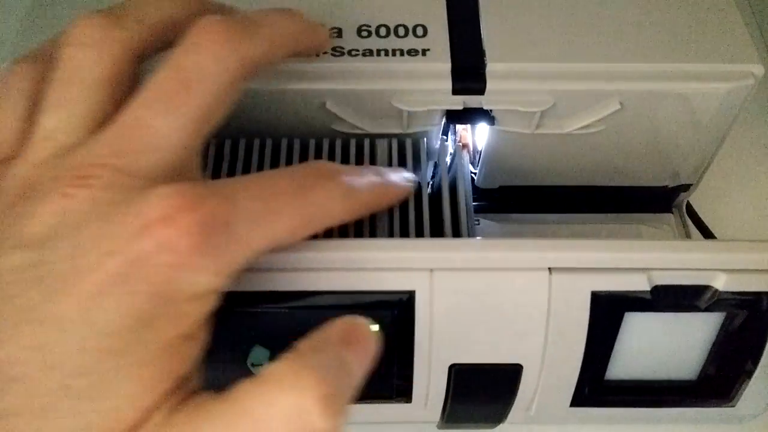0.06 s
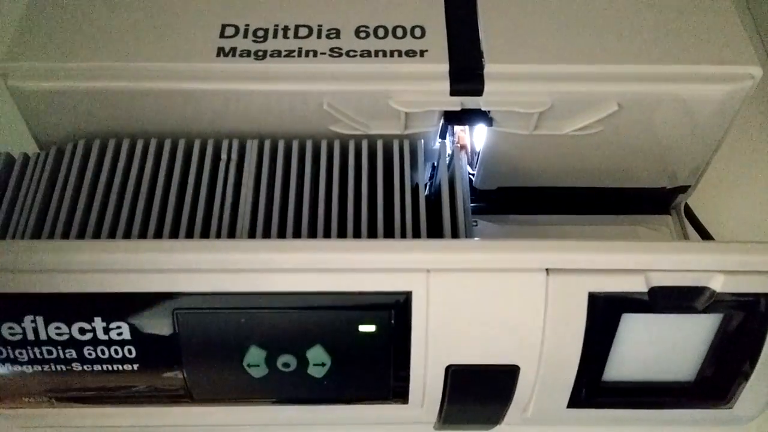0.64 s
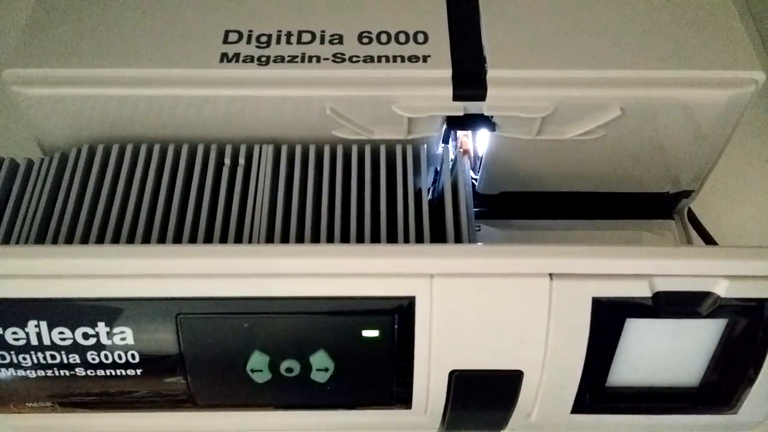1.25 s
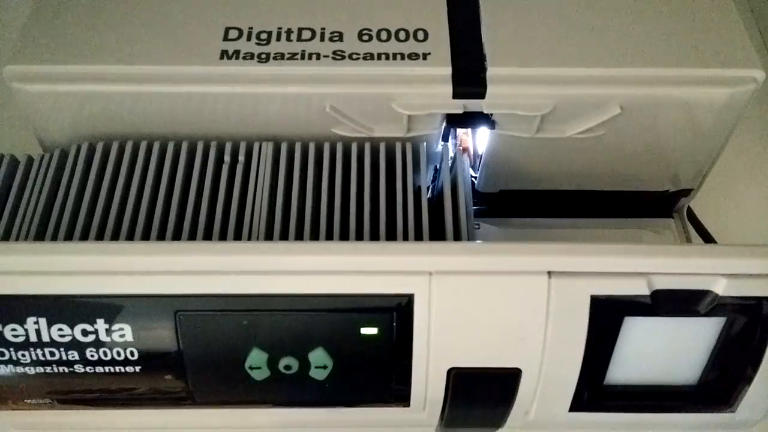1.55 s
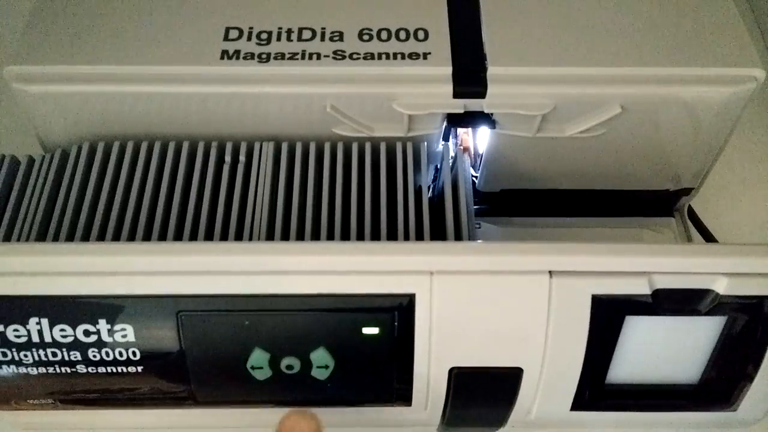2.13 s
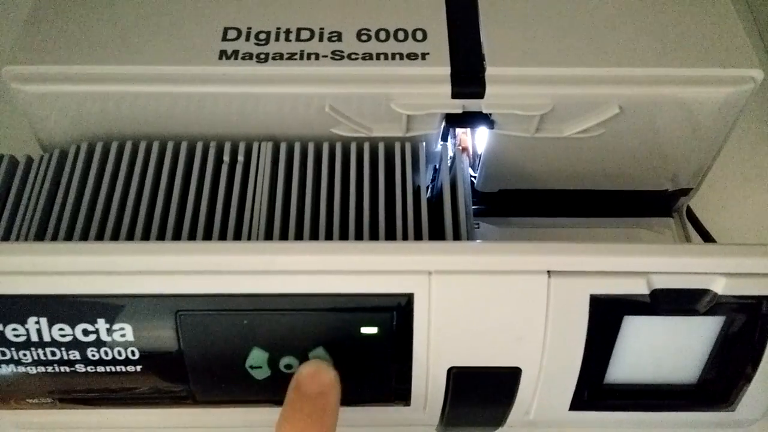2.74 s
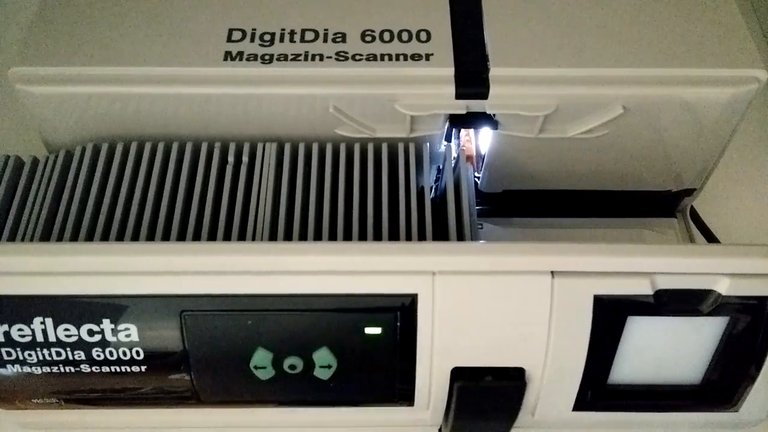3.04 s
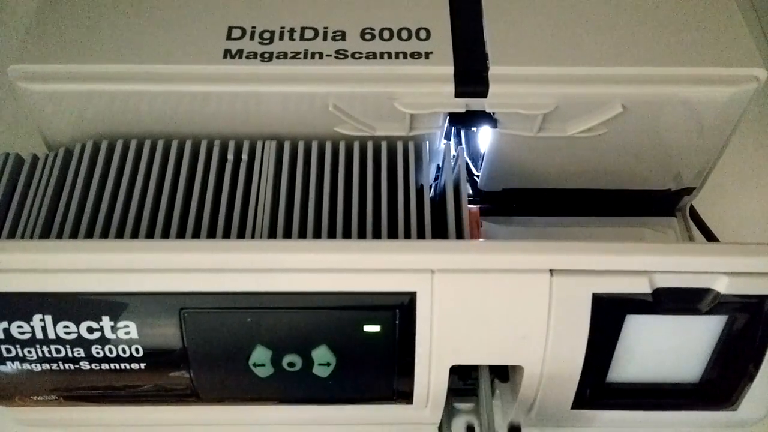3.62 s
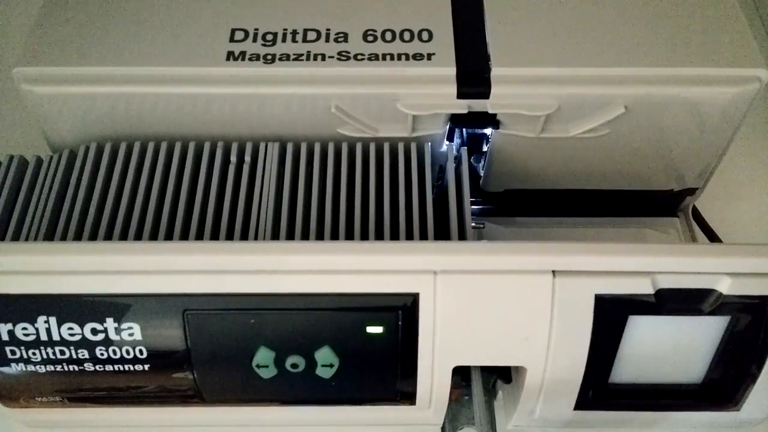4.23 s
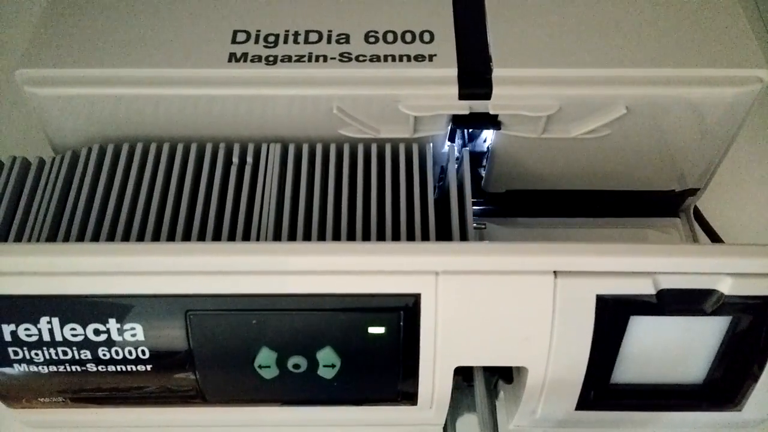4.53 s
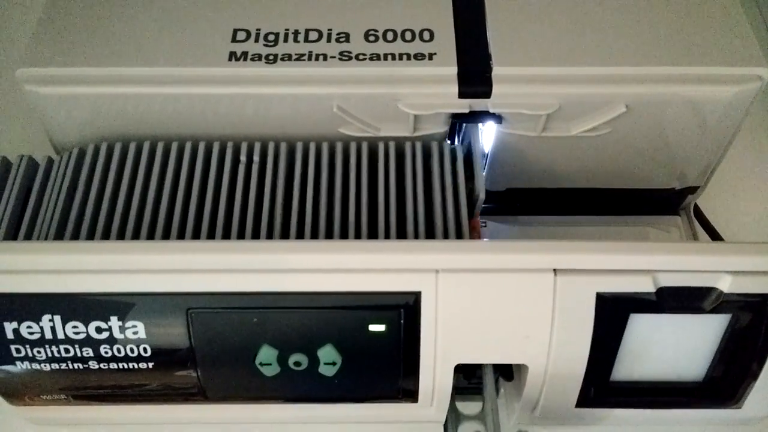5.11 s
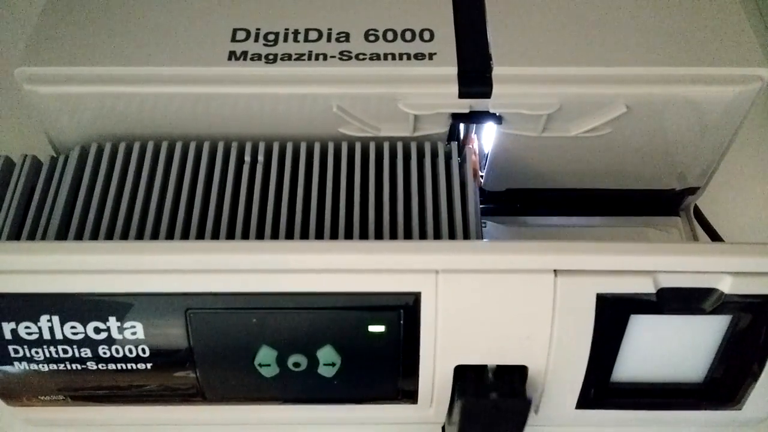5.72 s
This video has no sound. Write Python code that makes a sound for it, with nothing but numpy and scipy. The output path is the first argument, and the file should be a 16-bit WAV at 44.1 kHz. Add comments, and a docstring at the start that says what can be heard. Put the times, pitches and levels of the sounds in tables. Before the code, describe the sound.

Close by in a quiet room, plastic slides clatter briefly under a fingertip, followed by a soft rustle of cloth and a low hush. A button press then starts a motorised slide changer. For about three seconds its motor whirs in short stretches, switching between a lower and a higher pitch, with churning gears, rasping, squeaking plastic, sharp clicks and dull knocks from the casing.

```python
"""Slide scanner changing a slide

Close by in a quiet room, a finger riffles over plastic slide frames; the arm draws back and returns to
press a button. A stepper motor then runs the changing cycle leg by leg at two speeds: its gears churn,
the carrier scrapes along its guide, and latches and frames knock in the plastic case."""
import sys
import numpy as np
from scipy import signal
from scipy.fft import rfft, irfft
from scipy.io import wavfile
from scipy.ndimage import uniform_filter1d

SR = 44100
rng = np.random.default_rng(int(sys.argv[2]) if len(sys.argv) > 2 else 0)


def transcribe(signal):
    """Save signal, clipped to [-1, 1], as a 16-bit WAV file at the path in sys.argv[1]."""
    frames = np.atleast_2d(signal).T
    limited = np.clip(frames, -1, 1)
    pcm = np.round(limited * 32767).astype(np.int16)
    wavfile.write(sys.argv[1], SR, pcm)


N = 254016
T, HZ = np.arange(N) / SR, np.fft.rfftfreq(N, 1 / SR)

# Legs of the changing cycle: start/s, end/s, speed (0 slow, 1 fast), step tone/dB, its swell/dB,
# churn/dB, rumble/dB, hiss/dB, opening lurch/dB
LEGS = [(2.84, 3.154, 0, -51, 12, -47.5, -51.5, -64, 3),
        (3.168, 3.998, 1, -40.5, -2.5, -54.5, -55, -61, 12),
        (3.966, 4.244, 1, -43, 2.5, -55, -53.5, -60.5, 7),
        (4.228, 4.612, 1, -50.5, -2, -53, -56.5, -61.5, 6),
        (4.615, 4.973, 0, -45.5, 1.5, -67, -61, -64.5, 22), (4.952, 5.535, 0, -42, 3, -51.5, -54, -59, 6),
        (5.528, 5.8, 1, -46, -9.5, -49.5, -49.5, -57.5, 5)]


def amp(db):
    """Decibels to gain."""
    return 10 ** (np.asarray(db) / 20)


def unit(x):
    """Scales a sound so that the mean of its channels has rms 1."""
    return x / np.sqrt(np.mean(np.atleast_2d(x).mean(0) ** 2) + 1e-20)


def read(points, hz):
    """Reads a curve on a log-frequency axis."""
    f, value = np.transpose(points)
    return np.interp(np.log(hz + 1), np.log(f + 1), value)


def colour(x, spectrum):
    """Minimum-phase EQ: shapes a sound without smearing its attacks backwards."""
    gain = amp(read(spectrum, HZ))
    log_gain = np.log(np.maximum(gain / gain.max(), 1e-5))
    log_response = np.conj(signal.hilbert(np.r_[log_gain, log_gain[-2:0:-1]]))
    taps = np.fft.ifft(np.exp(log_response)).real[:4096]
    return signal.oaconvolve(x, taps / np.linalg.norm(taps))[:N]


def ring(x, modes):
    """Drives a set of damped modes."""
    t = T[:SR // 4]
    taps = sum(amp(db) * width * np.exp(-np.pi * width * t) * np.sin(2 * np.pi * hz * t)
               for hz, width, db in modes)
    return signal.oaconvolve(x, taps / np.linalg.norm(taps))[:N]


def waver(samples):
    """Slow random drift of rms 1."""
    return unit(uniform_filter1d(uniform_filter1d(rng.standard_normal(N), samples), samples))


def grains(per_s, spread_db):
    """A random train of tiny contacts of unequal size."""
    size = amp(spread_db * np.minimum(rng.exponential(1, N), 4)) * rng.choice([-1, 1], N)
    return unit(size * (rng.random(N) < per_s / SR))


def rattle(blows, first_db=-7):
    """Each blow (t/s, level/dB, chatter/s) is a first contact, then a quick run of them dying away."""
    chatter, out = grains(2500, 0.44), np.zeros(N)
    rise_s = 0.0009
    for start, db, length in blows:
        at = round(start * SR)
        t = T[:min(SR // 8, N - at)]
        burst = chatter[at:at + len(t)] * np.exp(-(t / (2 * length)) ** 2) * (1 - np.exp(-t / rise_s))
        burst[0] += amp(first_db) * np.linalg.norm(burst)
        gain = amp(db) * np.sqrt((length + 0.0041) * SR / (np.sum(burst ** 2) + 1e-9))
        out[at:at + len(t)] += gain * burst
    return out


def wash(spectrum):
    """Steady stereo noise, wide in the treble."""
    likeness = [(130, 0.9), (300, 0.53), (640, 0.4), (1400, 1), (3000, 0), (7000, 0)]  # between the microphone ports: f/Hz, correlation
    left, other = rfft(rng.standard_normal((2, N)))
    same = read(likeness, HZ)
    right = same * left + np.sqrt(1 - same ** 2) * other
    return unit(irfft(np.array([left, right]) * amp(read(spectrum, HZ)), N))


def hold(start, end, attack_s, release_s):
    """Envelope that rises, holds until end, then dies away."""
    return np.clip((T - start) / attack_s, 0, 1) * np.exp(-np.maximum(T - end, 0) / release_s)


def running(start, end, ramp_s=0.028):
    """1 while the motor drives a leg, with short ramps at both ends."""
    return np.clip(np.minimum(T - start, end - T) / ramp_s, 0, 1)


def stepper(jitter_rad=0.0136, flutter_db=2.0, load_db=0.9):
    """Clocked steps give a clean whine; the changing load shakes its level and phase."""
    # Step overtones at each speed: multiple of the step rate, level/dB
    slow_whine = [(2, -57), (3, -66), (4.5, -70), (7, -68), (10, -74), (13, -95), (13.5, -65), (14.5, -75),
                  (16, -83), (16.5, -63), (20, -67)]
    fast_whine = [(.5, -61.5), (2, -59.5), (3, -70.5), (4, -68.5), (5, -71), (6, -70), (7, -74), (8.5, -72),
                  (9, -67.5), (9.5, -90), (11.5, -72), (12, -65.5), (12.5, -73), (13.5, -71.5),
                  (16.5, -71.5), (17, -77), (17.5, -96)]
    slow_hz, fast_hz = 430.7, 657.85
    slack = amp(-11 * np.exp(-((T - 3.985) / 0.016) ** 2))  # the load lets go at the end of travel
    out = np.zeros((2, N))
    for speed, (hz, whine) in enumerate([(slow_hz, slow_whine), (fast_hz, fast_whine)]):
        on, gain = np.zeros((2, N))
        for start, end, leg_speed, db, swell_db, *_ in LEGS:
            if leg_speed == speed:
                drive = running(start, end)
                progress = np.clip((T - start) / (end - start), 0, 1)
                on = np.minimum(on + drive, 1)
                gain += slack * drive * amp(db + swell_db * progress)
        angle = 2 * np.pi * hz * T + jitter_rad * waver(500)
        flutter = amp(flutter_db * waver(2500))
        tone = gain * amp(load_db * waver(1200)) * np.sin(angle)
        for multiple, db in overtones(hz, whine):
            follow = (gain / gain.max()) ** min(1, 2 / multiple)  # low overtones ride the step tone
            phase = 2 * np.pi * rng.random() + np.array([[0], [rng.uniform(-1.4, 1)]])
            level = amp(db) * follow * on * np.roll(flutter, rng.integers(N))
            tone = tone + level * np.sin(multiple * angle + phase)
        out += np.sqrt(2) * tone
    return out


def overtones(hz, whine, buzz_db=-83):
    """The whine plus a faint treble buzz, on half multiples: the coil pattern repeats every two steps."""
    multiples = np.arange(round(2 * 5500 / hz), round(2 * 13500 / hz)) / 2
    levels = buzz_db - np.log2(multiples * hz / 6000)  # falls 1 dB per octave
    return {**dict(zip(multiples, levels)), **dict(whine)}.items()


def gears(uneven_db=5.0, lurch_s=0.017):
    """Teeth knock unevenly in the gearbox and shake the chassis, hardest as each leg begins."""
    # Tooth churn and chassis rumble: f/Hz, level/dB
    churn_eq = [(40, -56), (150, -22), (250, -8.5), (330, 1.5), (420, -14), (540, 1), (720, 1.5),
                (900, -8.5), (1300, -6), (1900, -13), (2600, -14), (4000, -17), (8000, -41.5)]
    rumble_eq = [(25, -40), (60, -52), (95, -2.5), (125, 2), (160, 0.5), (200, 0.5), (280, -44.5),
                 (600, -54)]
    churn, rumble = np.zeros((2, N))
    for start, end, *_, churn_db, rumble_db, _, lurch_db in LEGS:
        effort = running(start, end) * amp(lurch_db * np.exp(-np.maximum(T - start, 0) / lurch_s))
        churn += amp(churn_db) * effort
        rumble += amp(rumble_db) * effort
    teeth = colour(churn * grains(900, 2.3) * amp(uneven_db * waver(1100)), churn_eq)
    return teeth + colour(rumble * grains(400, 1.4), rumble_eq)


def rubbing():
    """Rasp, squeal and hiss envelopes: each stroke of the carrier grips, holds and lets go."""
    strokes = [(2.81, 2.84, -46, -56, -51), (2.862, 3.018, -40.5, -42.5, -72),
               (4.18, 4.292, -68, -58.5, -78), (4.337, 4.479, -58, -55, -80), (4.579, 4.637, -39, -48, -56),
               (4.65, 4.826, -40.5, -39, -58), (4.844, 4.943, -38.5, -42, -66),
               (5.077, 5.303, -73, -82, -55.5), (5.3, 5.36, -63, -69, -65)]  # along the guide: start/s, end/s, rasp/dB, squeal/dB, hiss/dB
    return sum(amp(levels)[:, None] * hold(start, end, attack_s=0.023, release_s=0.021)
               for start, end, *levels in strokes)


def carrier(squeal_db=1.0, grip_db=1.77):
    """Plastic sticks and slips on its guide, and the carrier squeals on its own modes."""
    rasp_eq = [(200, -51), (450, -12.5), (680, -4.5), (950, -8), (1330, -1), (2000, -13.5), (2500, -7),
               (3600, -9), (4800, -15.5), (5950, -4.5), (6500, -12), (7400, -8.5), (9500, -24.5),
               (16000, -62)]  # scraping plastic: f/Hz, level/dB
    squeal_modes = [(642, 4.6, 13), (2330, 72, -1.5), (2510, 130, 13), (2790, 110, 2)]  # carrier resonances: f/Hz, width/Hz, level/dB
    rasp, squeal, _ = rubbing()
    grip = amp(grip_db * waver(300))
    slips = grains(1500, 2.0)
    scrape = colour(grip * rasp * grains(2600, 0.57), rasp_eq)
    return scrape + amp(squeal_db) * ring(grip * squeal * slips, squeal_modes)


def knocks():
    """Each blow clacks the part itself, rings the case and ticks at the point of contact."""
    blows = [(2.695, -46.5, -41.5, -48.5, 0.0023), (2.819, -30.5, -33, -37, 0.01),
             (2.836, -38, -32, -40.5, 0.0073), (3.05, -40, -30.5, -55, 0.008),
             (3.140, -38, -33.5, -37, 0.0081), (3.162, -40.5, -32.5, -39.5, 0.0055),
             (3.336, -46, -43, -51.5, 0.0039), (3.45, -53, -49, -49.5, 0.0041),
             (3.575, -37, -36.5, -42.5, 0.0027), (3.68, -62, -39, -70, 0.0029),
             (4.18, -49, -61, -51, 0.0054), (4.194, -41.5, -31.5, -49, 0.0037),
             (4.284, -39, -44, -47, 0.0092), (4.394, -62, -70, -48, 0.0023),
             (4.467, -47.5, -46.5, -59, 0.0032), (4.517, -50.5, -39.5, -59, 0.011),
             (4.592, -42, -38.5, -37, 0.013), (4.616, -56, -39, -49, 0.014),
             (5.045, -47, -41.5, -44, 0.0077), (5.168, -58, -67, -39, 0.004),
             (5.315, -50.5, -43, -47, 0.026), (5.357, -51, -58, -53, 0.01),
             (5.453, -42, -53, -42.5, 0.0069), (5.521, -47, -39.5, -49.5, 0.0076),
             (5.574, -53, -35, -39.5, 0.0057), (5.724, -51, -36, -60, 0.0098)]  # latches and frames: t/s, clack/dB, knock/dB, tick/dB, chatter/s
    touches = [(0.769, -57, 0.013), (0.8, -73, .006), (0.85, -65, 0.0098), (0.945, -68, 0.0039),
               (2.536, -68.5, 0.017)]  # frames settle, the finger lands on the button: t/s, level/dB, chatter/s
    case_modes = [(246.3, 5.6, -0.5), (357, 27, -7), (521, 26, -2.5), (617, 12, -1), (666, 34, 5.5),
                  (900, 220, -28)]  # plastic case: f/Hz, width/Hz, level/dB
    # Midrange clack and bright tick: f/Hz, level/dB
    clack_eq = [(200, -75), (550, -55), (900, -7), (1170, 0), (1450, -2), (2050, -9.5), (2550, -3),
                (3200, -18.5), (4500, -19), (9000, -72)]
    tick_eq = [(1800, -15), (3600, 6), (4900, -1), (5900, 5.5), (7400, 4.5), (9000, -6), (12000, -20),
               (16000, -21)]
    times, clack_db, knock_db, tick_db, lengths = np.transpose(blows)
    body = ring(rattle(zip(times, knock_db, lengths), first_db=-6.5) + rattle(touches), case_modes)
    clack = colour(rattle(zip(times, clack_db, lengths), first_db=-8.5), clack_eq)
    tick = colour(rattle(zip(times, tick_db, lengths), first_db=-6), tick_eq)
    return body + clack + tick


def catches(push_s=0.0096, crack_s=0.0014):
    """The button and spring catches snap over: a bright crack, and the front panel rings."""
    snaps = [(2.696, -41.5, -47.5), (3.575, -52, -44), (4.2, -35, -64), (4.285, -39.5, -36.5),
             (5.045, -62, -41.5), (5.574, -63, -50)]  # t/s, panel ring/dB, crack/dB
    panel_modes = [(739, 31, -5.5), (1310, 67, -26), (1956, 30, -26), (3070, 120, -28), (3580, 150, -25)]  # front panel: f/Hz, width/Hz, level/dB
    crack_eq = [(2000, -46), (5000, 0.5), (8000, 3), (11000, -6.5), (15000, -9)]  # edge of the snap: f/Hz, level/dB
    push = rattle([(at, db, push_s) for at, db, _ in snaps], first_db=25.0)
    crack = rattle([(at, db, crack_s) for at, _, db in snaps])
    return ring(push, panel_modes) + colour(crack, crack_eq)


def thumps(rise_s=0.012, ring_db=-13, ring_t60=0.78):
    """The chassis swings for a few cycles on its feet, then rings out faintly."""
    jolts = [(2.632, -57, 144), (2.697, -39, 138.4), (2.826, -36.5, 139), (2.946, -40.5, 149),
             (3.047, -34, 125), (3.151, -24.5, 156.5), (3.68, -44.5, 157), (3.978, -46, 157),
             (4.188, -41.5, 146), (4.61, -37, 162.6), (4.643, -33, 168.2), (5.53, -27, 157),
             (5.575, -37.5, 151)]  # t/s, level/dB, f/Hz
    out = np.zeros(N)
    for start, db, hz in jolts:
        at = round(start * SR)
        t = T[:min(SR // 3, N - at)]
        swing = (t / rise_s * np.exp(1 - t / rise_s)) ** 3
        tail = amp(ring_db - 60 * t / ring_t60) * np.minimum(t / rise_s, 1)
        out[at:at + len(t)] += amp(db) * (swing + tail) * np.sin(2 * np.pi * hz * t)
    return out


def slides(snap_trim_db=-10, body_trim_db=-4, snap_s=0.0057, width_hz=85):
    """Frames snap off the fingertip, each at its own pitch, and jostle in the hollow magazine."""
    flicks = [(0.0135, -26, -42, 2260), (0.0647, -24.5, -31.5, 1440), (0.0763, -24, -52, 2380),
              (0.087, -32.5, -48, 2350), (0.112, -27.5, -48, 1140), (0.145, -31.5, -59, 2600),
              (0.1827, -23, -36, 1455), (0.2216, -25.5, -31, 1510), (0.2483, -28.5, -35.5, 2610),
              (0.2729, -33, -38, 2070), (0.286, -20, -38, 2300), (0.3612, -24, -49, 1900),
              (0.4246, -19.5, -51, 2510), (0.4642, -23, -62, 1800), (0.4907, -41.5, -39, 1790)]  # one per frame, before trim: t/s, snap/dB, body/dB, f/Hz
    drags = [(0, 0.009, -42, -49.5), (0.06, 0.501, -42, -51)]  # finger over the frames: start/s, end/s, rustle/dB, hollow ring/dB
    frame_eq = [(60, -50), (120, -18), (170, -8), (400, -55), (650, -10.5), (1010, -16), (1450, -12),
                (2040, -15.5), (2400, -10), (3120, -15), (4300, -10.5), (5300, -15.5), (6850, -3.5),
                (10000, -13), (16000, -22.5)]  # plastic clatter: f/Hz, level/dB
    magazine_modes = [(548.4, 8.4, 3), (705, 22, 2.5), (808, 170, -5), (1773, 14, -2), (2610, 48, -3)]  # hollow ring: f/Hz, width/Hz, level/dB
    rustle = sum(amp(db) * hold(start, end, 0.0035, release_s=0.0045) for start, end, db, _ in drags)
    hollow = sum(amp(db) * hold(start, end, 0.0035, release_s=0.029) for start, end, _, db in drags)
    snaps = rattle([(at, db + snap_trim_db, snap_s) for at, db, _, _ in flicks], first_db=-9.5)
    bodies = sum(ring(rattle([(at, db + body_trim_db, 0.002)]), [(hz, width_hz, 0)])
                 for at, _, db, hz in flicks)
    clatter = colour(snaps + rustle * grains(1100, 3.6), frame_eq)
    return clatter + bodies + ring(hollow * grains(500, 0.59), magazine_modes)


def glide():
    """Smooth parts hiss as they slide, more during a stroke of the carrier."""
    hiss_eq = [(800, 3.5), (2500, 1.5), (4500, -3.5), (6000, 2), (7500, 5.5), (9000, -3.5), (11000, -6),
               (16000, -19)]  # sliding friction: f/Hz, level/dB
    moving = sum(amp(hiss_db) * running(start, end) for start, end, *_, hiss_db, _ in LEGS)
    _, _, stroke = rubbing()
    return (moving + stroke) * amp(0.14 * waver(700)) * wash(hiss_eq)


def sleeve(still_db=-74.5):
    """Cloth swishes with the arm's speed, one arch per reach, and never lies quite still."""
    # Off the magazine, to the button, away again: start/s, end/s, swish/dB, flutter/dB
    reaches = [(0.476, 1.317, -57.5, -62), (1.68, 2.64, -73.5, -90.5), (2.74, 3.713, -57.5, -75)]
    # Cloth swish and its low flutter: f/Hz, level/dB
    swish_eq = [(180, -26), (300, -10), (412, -15), (565, -8.5), (842, -4), (961, -10.5), (1640, -8),
                (3640, -2), (4910, -4), (6960, 3), (8200, 0), (9800, -6.5), (16000, -10.5)]
    flutter_eq = [(20, -28), (35, 4), (50, 7), (75, -19), (150, -25), (400, -21), (1000, -76)]
    swish, flutter = np.zeros((2, N))
    for start, end, swish_db, flutter_db in reaches:
        speed = np.sin(np.pi * np.clip((T - start) / (end - start), 0, 1))
        swish += amp(swish_db) * speed
        flutter += amp(flutter_db) * speed
    cloth = (swish + amp(still_db)) * amp(0.87 * waver(900)) * wash(swish_eq)
    return cloth + flutter * wash(flutter_eq)


def room_tone(level_db=-69):
    """The room's low, steady hush."""
    hush_eq = [(25, -19), (52, 1.5), (85, -5.5), (122, 0.5), (157, -2), (200, -13.5), (360, -14),
               (600, -15.5), (1100, -24), (2500, -28.5), (5000, -33), (7000, -44.5), (10000, -35),
               (16000, -22)]  # f/Hz, level/dB
    return amp(level_db) * wash(hush_eq)


def space(x, case_t60, room_t60, room_db, scatter_db, turns_per_s=4.3):
    """Bass arrives directly; treble also scatters in the case by shifting paths; the room adds a tail."""
    t = T[:SR // 2]
    low, high = (signal.butter(3, 850, kind, fs=SR, output="sos") for kind in ("low", "high"))
    treble = signal.sosfilt(high, x) / np.sqrt(1 + amp(2 * scatter_db) / 2)  # shares out the energy
    out = signal.sosfilt(low, x) + np.array([np.roll(treble, 4), treble])
    for path in range(3):
        case, room = rng.standard_normal((2, 2, len(t)))
        case *= amp(-60 * t / case_t60)
        room *= amp(-60 * t / room_t60) * (t > 0.008)
        share = np.sqrt(2 / 3) * np.cos(np.pi * (turns_per_s * T + path / 3))  # crossfades the paths
        for sound, taps, db in ((treble, case, scatter_db), (x, room, room_db)):
            wet = signal.oaconvolve((sound * share)[None], taps / np.linalg.norm(taps[0]), axes=1)
            out += amp(db) * wet[:, :N]
    return out


def scene():
    """Magazine and mechanism in the open case, over the room's own hush."""
    magazine = space(slides(), case_t60=0.029, room_t60=0.2, room_db=-9.5, scatter_db=7.5)
    drive = space(gears() + carrier(), case_t60=0.061, room_t60=0.13, room_db=-19.0, scatter_db=8.0)
    blows = space(knocks() + catches(), case_t60=0.049, room_t60=0.22, room_db=-13.0, scatter_db=8.5)
    return magazine + drive + blows + glide() + thumps() + stepper() + sleeve() + room_tone()


def record(dry, low_cut_hz=38, high_cut_hz=15900):
    """Two microphone ports, the right much brighter than the left, then a low cut and a high cut."""
    balance = [(150, -2), (260, -2.5), (340, 10.5), (450, -0.5), (660, -7), (1000, 2.5), (1300, 0),
               (2600, 4.5), (4800, -5), (6200, -14), (7500, -21.5), (10000, -15.5), (15000, -12)]  # between the ports: f/Hz, left minus right/dB
    tilt = amp(read(balance, HZ) / 2)
    ports = np.array([tilt, 1 / tilt]) / np.sqrt((tilt ** 2 + tilt ** -2) / 2)
    low_cut = signal.butter(4, low_cut_hz, "high", fs=SR, output="sos")
    high_cut = signal.firwin(511, high_cut_hz, window=("kaiser", 9), fs=SR)
    heard = signal.sosfilt(low_cut, irfft(rfft(dry) * ports, N))
    return signal.oaconvolve(heard, high_cut[None], "same")


dry = scene()
out = record(dry)
transcribe(out)
```